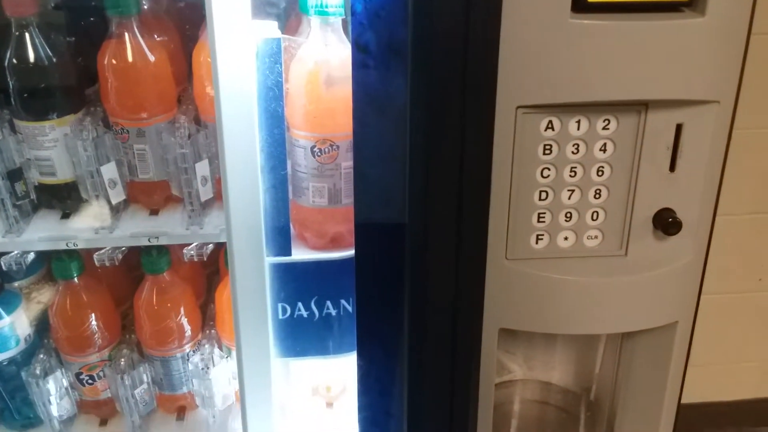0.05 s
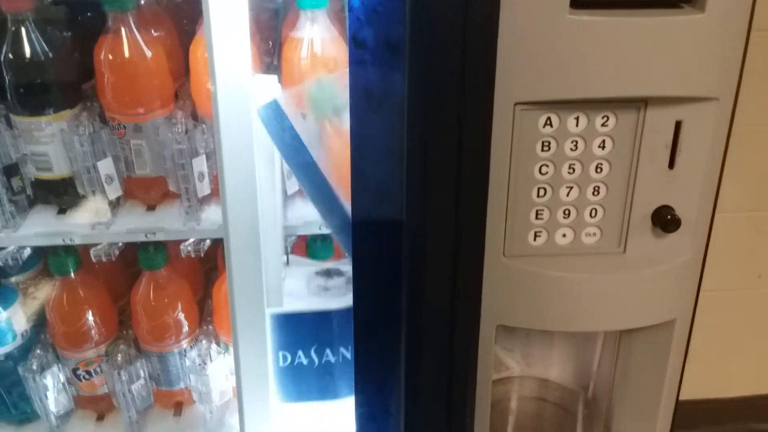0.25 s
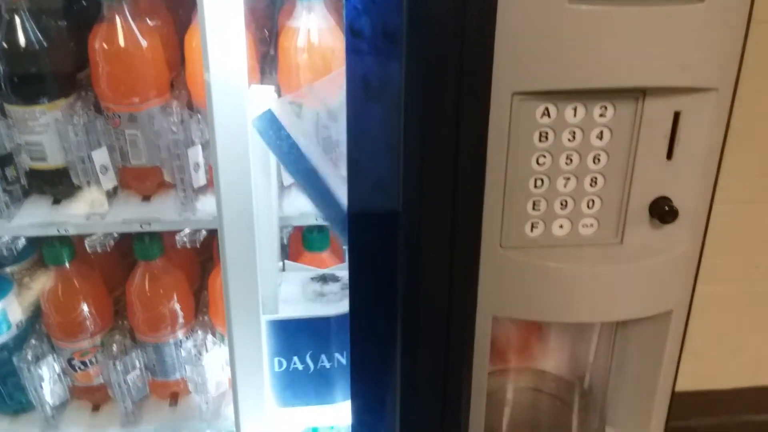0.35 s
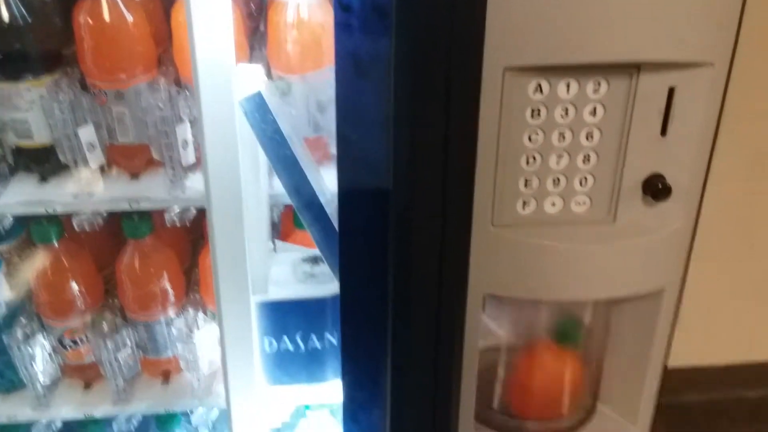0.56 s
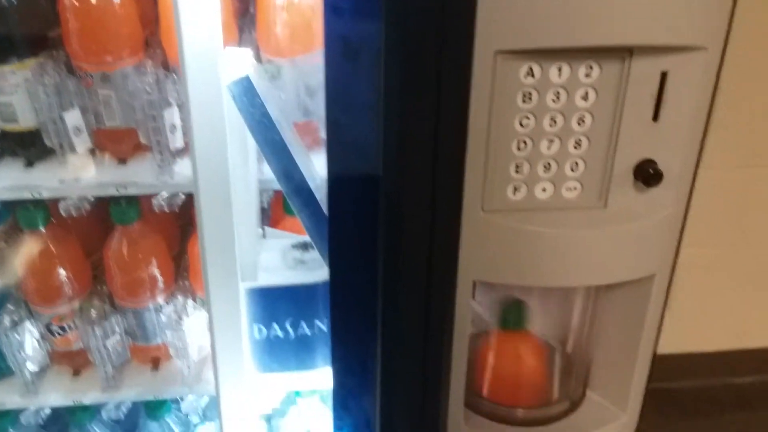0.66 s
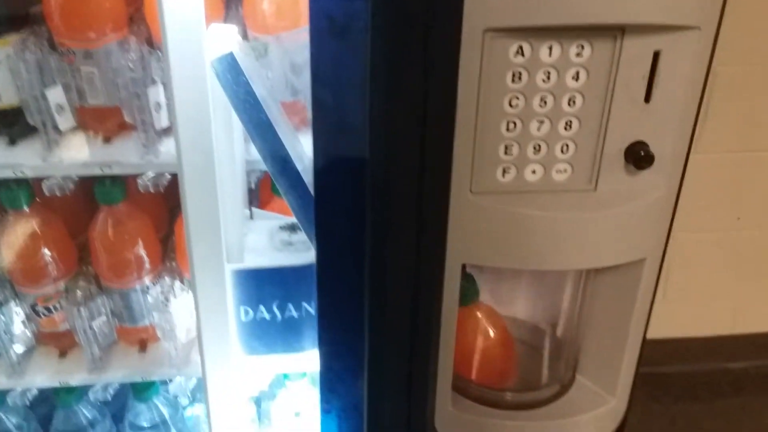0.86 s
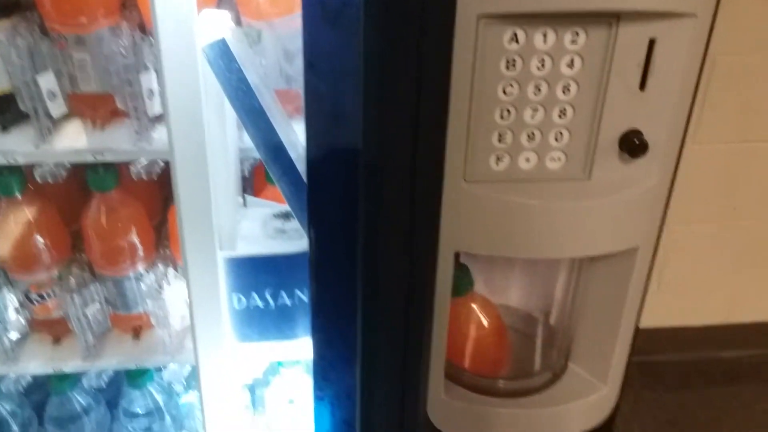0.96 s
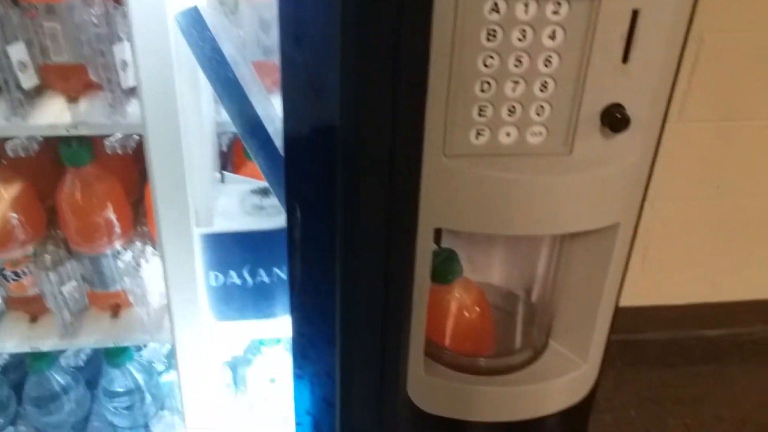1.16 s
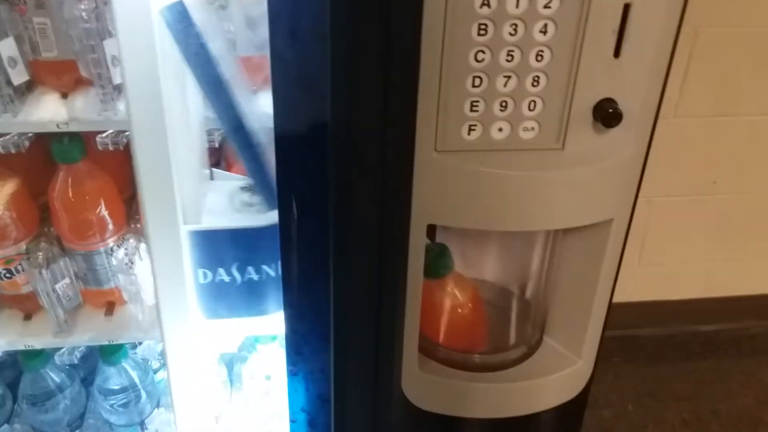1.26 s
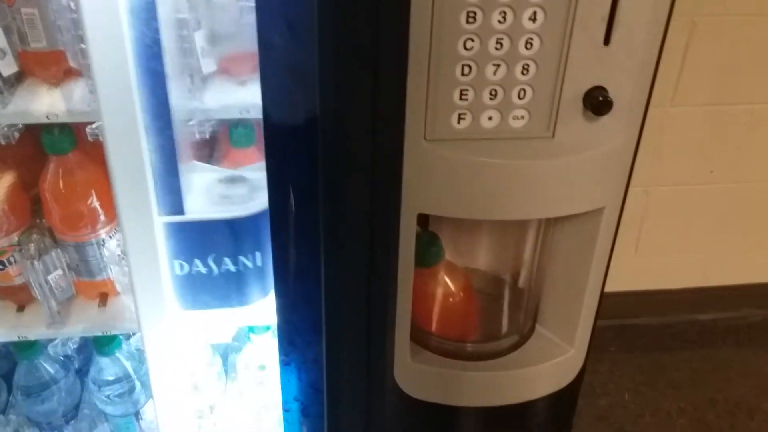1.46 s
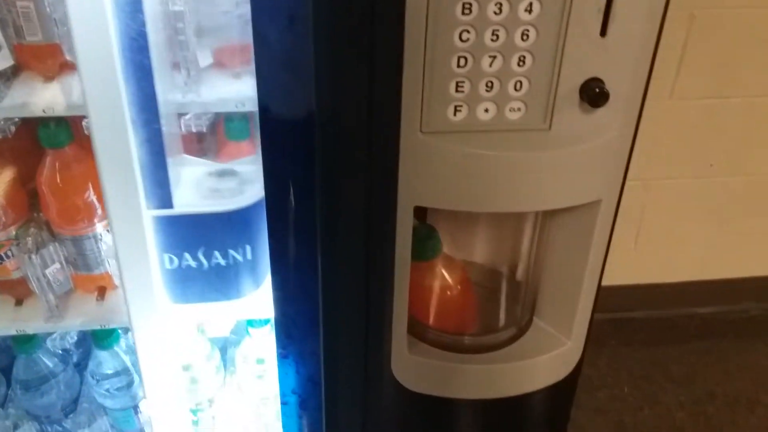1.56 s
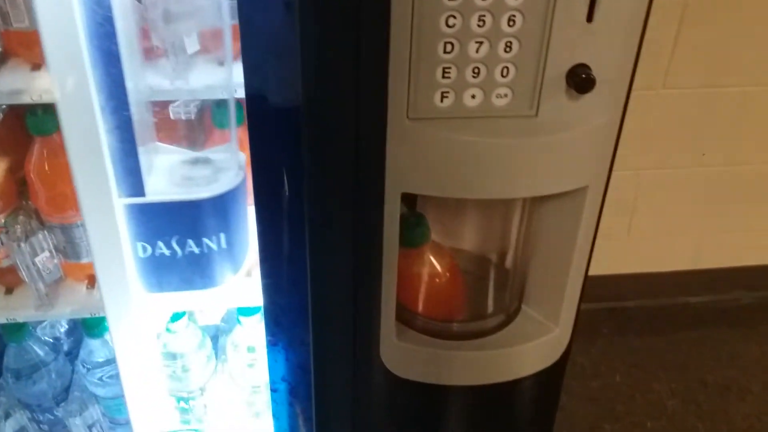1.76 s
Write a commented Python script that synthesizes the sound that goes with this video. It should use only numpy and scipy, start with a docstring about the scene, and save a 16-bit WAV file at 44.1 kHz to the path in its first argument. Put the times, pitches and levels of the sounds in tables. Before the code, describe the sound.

Close by in an echoing corridor, a vending machine drops a plastic bottle: a brief motor whirr, hollow knocks, then a loud boxy clatter. A catch clicks and a gate shuts with a dull thud over a faint fan and hum.

```python
"""Vending machine delivers a bottle

A plastic bottle tips out of the carrier, knocks through a flap and clatters into the delivery port.
The port's catch clicks and the carrier's gate swings shut with a thud. Each blow is a burst of dense
panel noise plus a few clear ringing modes, and the cabinet booms underneath. The carrier's motor
whirrs briefly; the cooling unit hums and its fan rushes throughout, in a hard-walled corridor."""
import sys
import numpy as np
from scipy import signal
from scipy.fft import rfft, irfft
from scipy.io import wavfile
from scipy.ndimage import uniform_filter1d

SR = 44100
rng = np.random.default_rng(int(sys.argv[2]) if len(sys.argv) > 2 else 0)


def inscribe(sig):
    """Save sig as 16-bit PCM at rate SR to the path in sys.argv[1].

    A 1-D sig is mono; a 2-D sig holds one channel per row.
    Samples are clipped to [-1, 1] before scaling.
    """
    pcm = np.round(np.clip(np.atleast_2d(sig).T, -1, 1) * 32767)
    wavfile.write(sys.argv[1], SR, pcm.astype(np.int16))


N = 79380
TIME = np.arange(N) / SR
FREQS = np.maximum(np.arange(N // 2 + 1) * SR / N, 1)

# Borders of the five registers (thud, knock, clack, crack, tick): edge_hz
REGISTER_EDGES_HZ = [80, 520, 1700, 4100, 9500, 17000]
# Where the mechanism sits in the stereo picture: freq_hz, left_minus_right_db
MACHINE_BALANCE = [(100, -0.5), (500, 0.5), (770, 3.5), (1400, 2.5), (2000, 3.5), (2800, -10.5),
                   (4000, -11.5), (6400, -4), (9800, -0.5), (15000, -1)]
# Diffuse sound, centred in the lows and wide on top: freq_hz, left_right_correlation
DIFFUSE_LIKENESS = [(350, 0.92), (800, 0.46), (1500, 0)]


def from_db(db):
    """Decibels to gain."""
    return 10 ** (np.asarray(db) / 20)


def at_hz(points, hz):
    """Read a curve on a log-frequency axis."""
    points_hz, values = np.array(points).T
    return np.interp(np.log(hz), np.log(points_hz), values)


def pan(db):
    """Left and right gains at constant total power, the left louder by db."""
    gains = from_db(np.array([db / 2, -db / 2]))
    return gains / np.sqrt(np.mean(gains ** 2, axis=0))


def noise(colour, likeness, balance, low_hz=15, high_hz=20000):
    """Coloured stereo noise between two steep band edges, at unit rms."""
    mid, side = rfft(rng.standard_normal((2, N)))
    alike = np.clip(at_hz(likeness, FREQS), -.995, .995)
    pair = np.sqrt(1 + alike) * mid + np.sqrt(1 - alike) * side * [[1], [-1]]
    band = 1 / np.sqrt((1 + (low_hz / FREQS) ** 12) * (1 + (FREQS / high_hz) ** 12))
    shaped = irfft(pair * band * from_db(at_hz(colour, FREQS)) * pan(at_hz(balance, FREQS)), N)
    return shaped / np.sqrt(np.mean(shaped ** 2) + 1e-20)


def evened(x):
    """Ride the level of a noise to take out its chance swells."""
    return x / np.sqrt(uniform_filter1d(np.mean(x ** 2, axis=0), size=700) + 1e-12)


def struck(start_s, rise_s, t60_s):
    """Envelope of a blow: quick rise, exponential decay."""
    age = np.maximum(TIME - start_s, 0)
    return (1 - np.exp(-age / rise_s)) * np.exp(-np.minimum(np.log(1000) * age / t60_s, 40))


def cooling_unit():
    """Compressor hum and a thin whine under the rush of the fan, with a faint hiss on top."""
    # Steady hum and whine tones: pitch_hz, rms_db
    tones = [(60, -58), (120, -50), (164, -54.5), (208, -49.5), (5200, -86)]
    # Spectra of the fan's rush and of the hiss: freq_hz, relative_db
    fan_colour = [(22, -33), (45, -8.5), (87, -16.5), (108, -4.5), (205, -8.5), (335, -13), (466, -18),
                  (595, -18.5), (868, -28), (1110, -27.5), (1320, -35), (2750, -32), (5000, -68),
                  (6500, -93)]
    hiss_colour = [(4000, 7), (10000, -6.5), (14000, -2)]
    # Stereo placement of both: freq_hz, left_minus_right_db
    balance = [(1200, 0.5), (2500, -6.5), (6000, -16), (10000, 6)]
    hum = sum(from_db(db) * np.sqrt(2) * np.sin(2 * np.pi * (hz * TIME + rng.random()))
              for hz, db in tones)
    fan = from_db(-40.5) * noise(fan_colour, DIFFUSE_LIKENESS, balance, high_hz=6000)
    hiss = from_db(-71) * noise(hiss_colour, DIFFUSE_LIKENESS, balance)
    return hum + fan + hiss


def carrier_motor():
    """A low whirr that dies away as the carrier tips the bottle out."""
    # Spectrum of the whirr: freq_hz, relative_db
    colour = [(200, -3), (320, -5.5), (500, -16), (2500, -34)]
    stop_s, fade_s = 0.25, 0.063
    running = np.clip((stop_s - TIME) / fade_s + 1, 0, 1)
    whirr = noise(colour, DIFFUSE_LIKENESS, MACHINE_BALANCE, low_hz=169, high_hz=3000)
    return from_db(-43.5) * running * whirr


def panels(blows, colour, room_db, snap_db):
    """Blows snap and stir the dense modes of plastic and sheet metal; the corridor holds their energy."""
    # Panel envelope, one value per register: attack_s; multiplier of a blow's base_t60_s
    attack_s = [0.0055, 0.0048, 0.0037, 0.0012, 0.0023]
    ring_scale = [1.52, 1.18, 1.49, 1.3, 0.81]
    # Corridor reverb, one value per register: send_db (added to room_db); t60_s
    send_db = [-8, -10, -16, -17.5, -17]
    room_t60_s = [0.92, 0.81, 1, 0.8, 0.48]
    # Stereo width of the direct sound: freq_hz, left_right_correlation
    direct_likeness = [(800, 1), (1300, 0.63), (2100, -0.2), (3300, 0.04), (12000, 0.059)]
    # Stereo placement of the reverb: freq_hz, left_minus_right_db
    room_balance = [(1200, -0.5), (2800, -7), (6000, -2), (12000, 1.5)]
    dulled = [(hz, db - 5 * (hz / 10000) ** 2) for hz, db in colour]  # air softens the reverb's top
    snaps = [from_db(snap_db) * struck(start_s, rise_s=0.00057, t60_s=0.023) for start_s, *_ in blows]
    out = 0
    for k, edges in enumerate(zip(REGISTER_EDGES_HZ, REGISTER_EDGES_HZ[1:])):
        power = 0
        for (start_s, *levels_db, base_t60_s, _), snap in zip(blows, snaps):
            body = struck(start_s, attack_s[k], base_t60_s * ring_scale[k])
            power += from_db(levels_db[k]) ** 2 * (body ** 2 + snap ** 2)
        feedback = np.exp(-2 * np.log(1000) / (room_t60_s[k] * SR))
        lingering = signal.lfilter([1 - feedback], [1, -feedback], power)
        direct = np.sqrt(power) * evened(noise(colour, direct_likeness, MACHINE_BALANCE, *edges))
        reverb = np.sqrt(lingering) * evened(noise(dulled, DIFFUSE_LIKENESS, room_balance, *edges))
        out += direct + from_db(send_db[k] + room_db) * reverb
    return out


def ringing(blows, modes, favour_db):
    """A part's clear modes: every blow strikes them all, boosting those its point of contact favours."""
    favour_octaves, rise_cycles = 0.25, 0.39
    out = np.zeros((2, N))
    for hz, mode_db, t60_s in modes:
        impulses = np.zeros(N)
        register = np.searchsorted(REGISTER_EDGES_HZ[1:-1], hz)
        for start_s, *levels_db, _, favoured_hz in blows:
            nearness = np.exp(-(np.log2(hz / favoured_hz) / favour_octaves) ** 2)
            impulses[int(start_s * SR)] = from_db(levels_db[register] + mode_db + favour_db * nearness)
        ring = struck(0, rise_cycles / hz, t60_s) * np.sin(2 * np.pi * hz * TIME)
        out += pan(at_hz(MACHINE_BALANCE, hz))[:, None] * signal.fftconvolve(impulses, ring[:N // 2])[:N]
    return out


def flap_knocks():
    """The bottle tips out of the carrier and knocks against the flap."""
    # Knocks: start_s, thud_db, knock_db, clack_db, crack_db, tick_db, base_t60_s, favoured_hz
    blows = [(.119, -33, -42.5, -51, -58.5, -68, 0.49, 201),
             (.183, -25.5, -31.5, -37.5, -40, -46, 0.18, 220), (.222, -27, -35, -38.5, -65, -75, 0.43, 291),
             (.269, -17.5, -17.5, -19.5, -26.5, -33, 0.062, 298),
             (.308, -41.5, -34, -37.5, -41, -40, 0.26, 360),
             (.344, -19, -17.5, -17.5, -27.5, -37.5, 0.063, 2400)]
    # Hollow tone of the dense modes: freq_hz, relative_db
    colour = [(47, -46), (80, -1), (252, -0.5), (358, -3.5), (607, -25), (845, -15.5), (2130, -23.5),
              (2380, -19), (3310, -23.5), (4720, -38), (5500, -30.5), (10200, -46.5), (15500, -39.5)]
    # Clear modes of the flap: pitch_hz, relative_db, t60_s
    modes = [(288.5, -7.5, 0.13), (357.1, -11, 0.41), (1320, -11, 0.0795), (1904, -9.5, 0.12),
             (2364, -7, 0.083), (3370, -0.5, 0.026)]
    return panels(blows, colour, room_db=9.5, snap_db=-7) + ringing(blows, modes, favour_db=6.5)


def cabinet_boom():
    """The bottle's weight and the closing gate set the cabinet wall's lowest mode booming."""
    # Soft pushes on the wall: start_s, level_db
    pushes = [(0.169, -24), (0.212, -53), (.318, -21.5), (.405, -32), (.468, -47), (0.584, -28.5),
              (1.409, -39)]
    pitch_hz, rise_s, t60_s = 65.6, 0.011, 0.4
    return sum(from_db(db) * struck(start_s, rise_s, t60_s)
               * np.sin(2 * np.pi * pitch_hz * (TIME - start_s)) for start_s, db in pushes)


def port_clatter():
    """The bottle lands and bounces in the delivery port."""
    # Bounces: start_s, thud_db, knock_db, clack_db, crack_db, tick_db, base_t60_s, favoured_hz
    blows = [(.405, -22, -18.5, -17.5, -32.5, -43, 0.13, 372),
             (.413, -15.5, -15, -16.5, -24, -28, 0.25, 304), (.433, -18, -15.5, -17, -28, -31.5, 0.35, 359),
             (.468, -13, -12.5, -11, -19, -23.5, 0.17, 2496),
             (.490, -13, -17, -22, -26.5, -40.5, 0.13, 162), (.528, -13, -11, -12.5, -25, -31.5, 0.12, 857),
             (.543, -16.5, -29, -20.5, -22, -30, 0.12, 1066),
             (.567, -19.5, -11.5, -8, -17, -28, 0.063, 2900),
             (.582, -19.5, -13.5, -15.5, -23.5, -28.5, 0.22, 1280),
             (.615, -18, -23, -21, -35, -46, 0.098, 415), (.638, -27, -20.5, -17.5, -30, -46, 0.055, 860),
             (.681, -32, -47, -43, -42, -45, 0.087, 398)]
    # Boxy tone of the dense modes: freq_hz, relative_db
    colour = [(47, -33.5), (80, -10.5), (162, -1), (230, -11.5), (350, -4.5), (520, -7.5), (741, -8.5),
              (827, -0.5), (944, -8.5), (1230, -6), (1710, -15), (2840, -15.5), (5150, -33.5),
              (7490, -35.5), (9760, -45), (13300, -33.5), (15500, -39.5)]
    # Clear modes of the port: pitch_hz, relative_db, t60_s
    modes = [(122, -9.5, 0.18), (166.4, -7, 0.68), (356.3, -4, 0.22), (408, -8, 0.66), (554, -18.5, 0.44),
             (813, -24, 0.32), (861, -14, 0.34), (1098, -12, 0.52), (1160, -11, 0.37), (1270, -8.5, 0.22),
             (1382, -12.5, 0.27), (1586, -16, 0.31), (1885, -12.5, 0.14), (2490, -14, 0.23),
             (2905, -21.5, 0.46)]
    return panels(blows, colour, room_db=1.5, snap_db=1.5) + ringing(blows, modes, favour_db=5.5)


def catch_clicks():
    """The port's catch gives a sharp double click, then a faint single one."""
    # Clicks: start_s, thud_db, knock_db, clack_db, crack_db, tick_db, base_t60_s, favoured_hz
    blows = [(.7675, -34, -36, -17, -22, -41.5, 0.023, 3310), (.774, -29, -22, -22.5, -33, -62, 0.1, 1470),
             (1.019, -52, -41.5, -37, -55, -80, 0.043, 2600)]
    # Bright tone of the dense modes: freq_hz, relative_db
    colour = [(120, -16.5), (200, -16), (575, -18), (812, -2), (1050, -13.5), (1590, -4), (2800, 10),
              (3600, -7.5), (4500, -20.5), (15500, -43)]
    # Clear modes of the catch: pitch_hz, relative_db, t60_s
    modes = [(1195, -3, 0.048), (1267, -7.5, 0.15), (1620, -7, 0.1), (2386, -7, 0.067), (2863, -3.5, 0.039),
             (3460, -9.5, 0.1), (3660, -17.5, 0.091)]
    return panels(blows, colour, room_db=0, snap_db=2) + ringing(blows, modes, favour_db=8)


def gate_thud():
    """The carrier's gate swings back and shuts with a thud."""
    # Contacts: start_s, thud_db, knock_db, clack_db, crack_db, tick_db, base_t60_s, favoured_hz
    blows = [(1.326, -58, -38, -47.5, -61.5, -72, 0.13, 1380),
             (1.380, -36, -35.5, -35.5, -41, -54, 0.18, 3370),
             (1.403, -27, -27.5, -27, -33, -38, 0.072, 348), (1.4305, -27.5, -38, -59, -70, -75, .1, 171)]
    # Dark tone of the dense modes: freq_hz, relative_db
    colour = [(47, -37), (80, -9), (109, 5), (252, 1.5), (374, 2), (569, -18.5), (864, -16.5),
              (1260, -17.5), (3390, -29.5), (4410, -36), (7660, -38.5), (15500, -54)]
    # Clear modes of the gate: pitch_hz, relative_db, t60_s
    modes = [(115.6, 4.5, 0.14), (179, -1.5, 0.12), (290.4, -12, 1), (357, 0, 0.099), (1390, -11, 0.032),
             (3420, -11.5, 0.12)]
    return panels(blows, colour, room_db=4, snap_db=1) + ringing(blows, modes, favour_db=7.5)


def scene():
    """The bottle's delivery over the bed of the running machine."""
    delivery = flap_knocks() + cabinet_boom() + port_clatter() + catch_clicks() + gate_thud()
    return delivery + carrier_motor() + cooling_unit()


def record(dry):
    """Soft saturation rounds the peaks and a steep low-pass trims the very top."""
    rounded = 1.417 * np.tanh(dry / 1.388)
    cutoff_hz = 15830
    return signal.sosfilt(signal.ellip(12, .1, 80, cutoff_hz, fs=SR, output="sos"), rounded)


dry = scene()
out = record(dry)
inscribe(out)
```